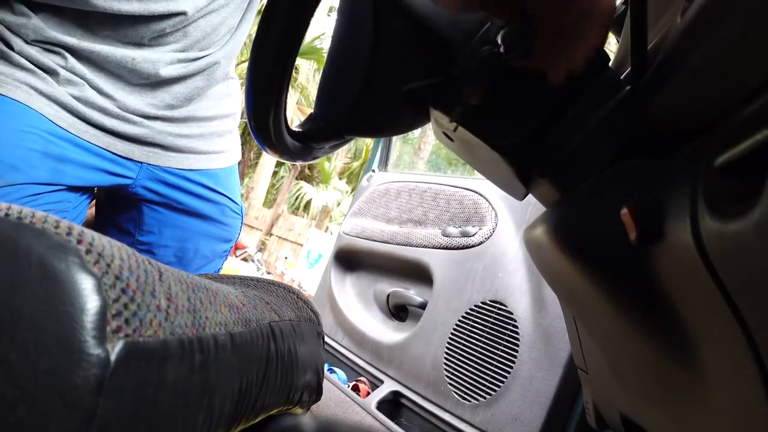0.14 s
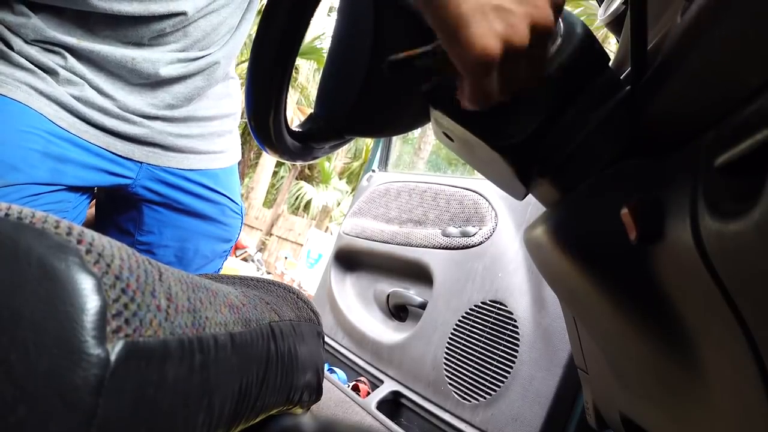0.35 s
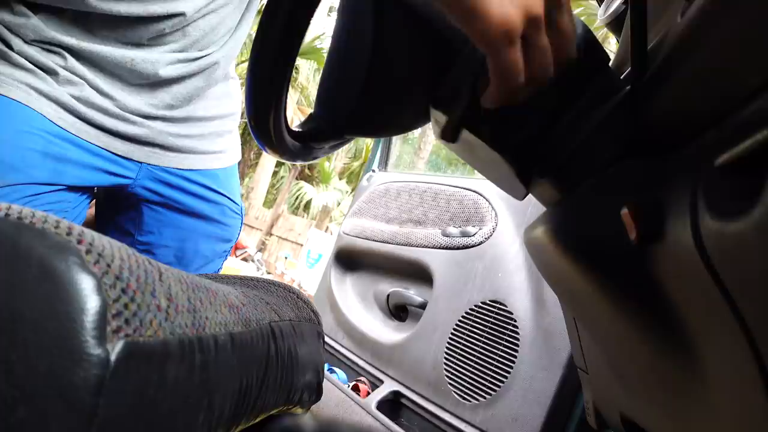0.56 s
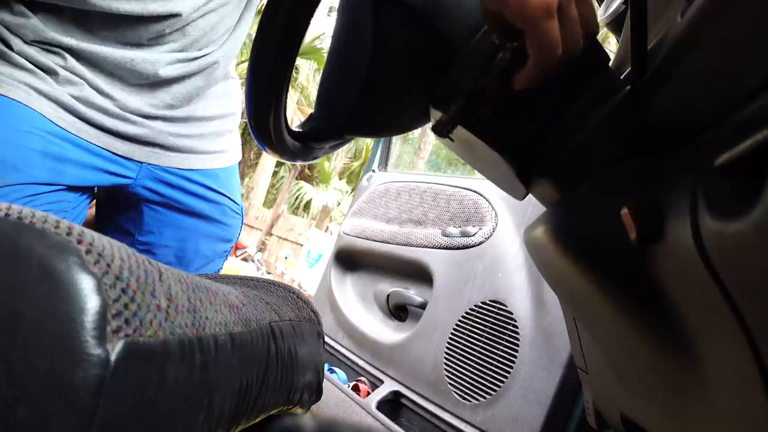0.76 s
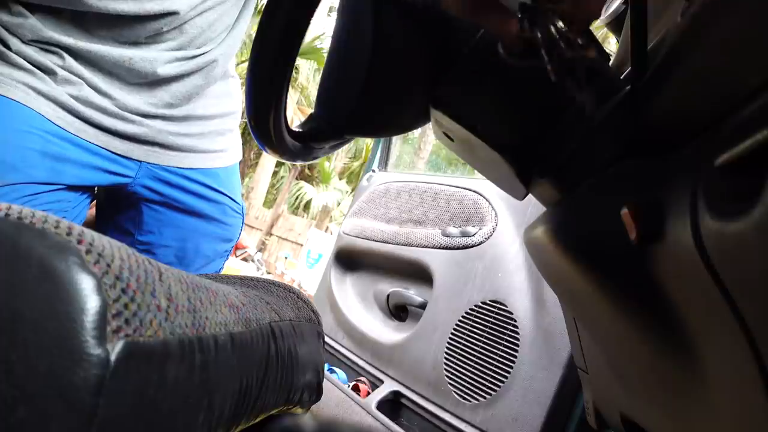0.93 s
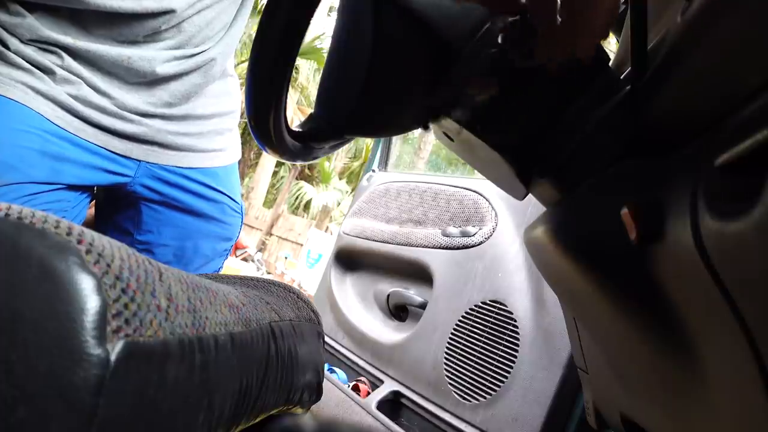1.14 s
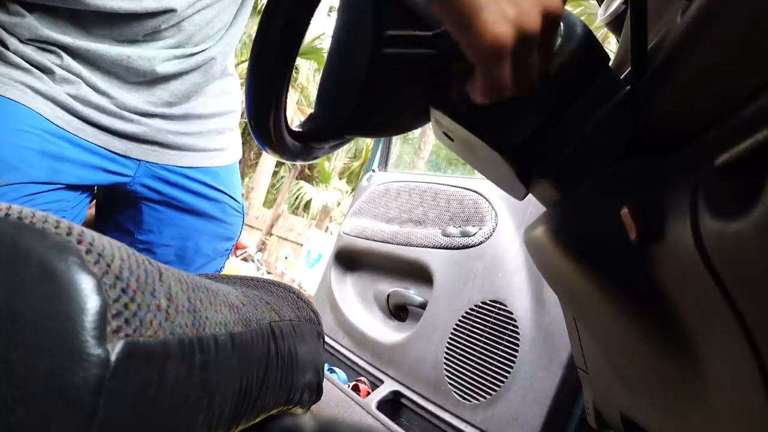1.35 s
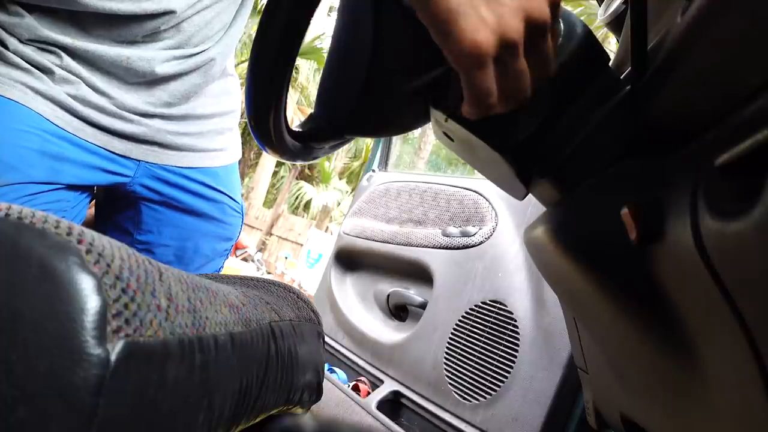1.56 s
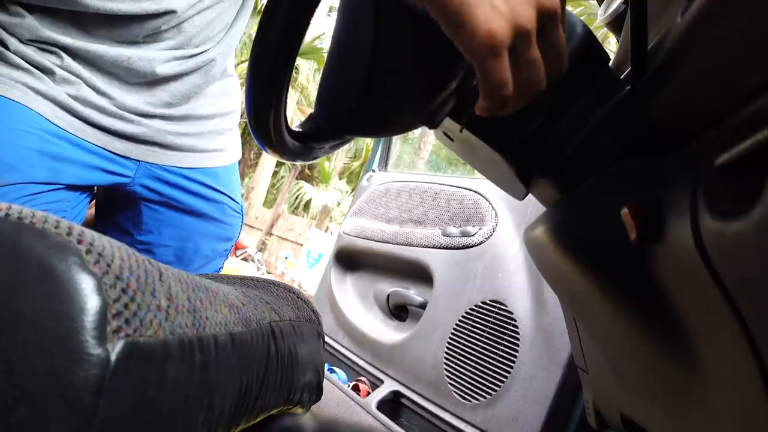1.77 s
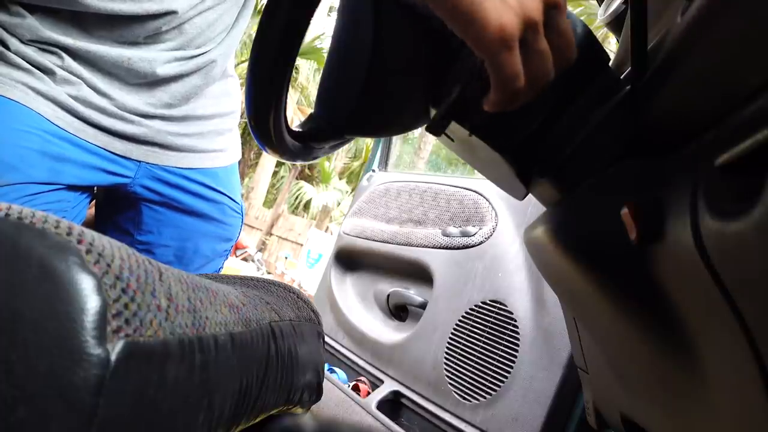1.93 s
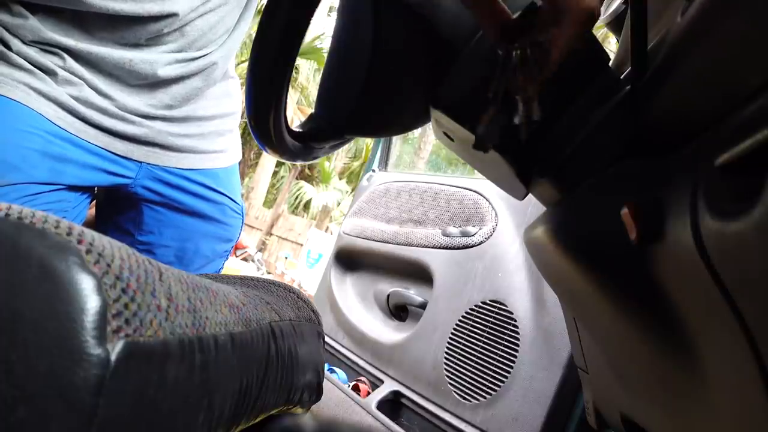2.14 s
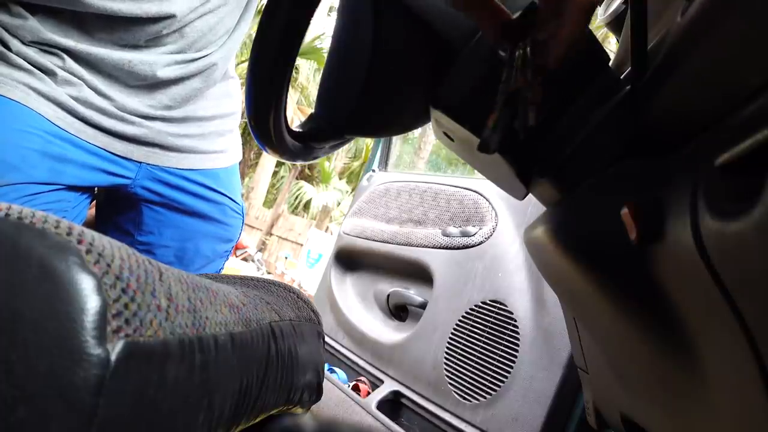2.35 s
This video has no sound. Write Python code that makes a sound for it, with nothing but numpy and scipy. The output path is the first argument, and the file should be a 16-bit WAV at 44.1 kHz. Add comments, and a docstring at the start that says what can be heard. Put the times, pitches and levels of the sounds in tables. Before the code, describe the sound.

A key clacks in a car's ignition lock, close by, with the hanging keys ticking and jingling. Light clinks lead to a loud cluster of clacks at about 0.3 seconds, another near 0.85, and a longer rattle from 1.15 to 1.4. After a lull, small clicks lead to a last clack at 2.1. Soft handling rumble, a faint outdoor hush and distant insects lie underneath.

```python
"""Key in an ignition lock.

A key is worked back and forth in a parked car with its door open. The lock's detents clack and ring
the barrel and the column housing; the hanging keys tick, chime and slide on each other. The small cabin
gives each hit a short tail; behind it are handling rumble and a faint outdoor hush with insects."""
import sys
import numpy as np
from scipy import signal
from scipy.fft import rfft, irfft
from scipy.io import wavfile

SR = 44100
rng = np.random.default_rng(int(sys.argv[2]) if len(sys.argv) > 2 else 0)


def to_wav(sig):
    """Store sig (one row per channel, or 1-D mono) as 16-bit WAV at the path in sys.argv[1].

    Samples outside -1..1 are clipped; the rate is SR.
    """
    pcm = np.clip(np.atleast_2d(sig), -1, 1) * 32767
    pcm = np.round(pcm).astype(np.int16)
    wavfile.write(sys.argv[1], SR, pcm.T)  # frames by channels


N = 105840
TIME = np.arange(N) / SR
AGE = np.arange(int(0.45 * SR)) / SR  # s since a hit
TOP_HZ = 16000


def undb(db):
    """Decibels to gain."""
    return 10 ** (np.asarray(db) / 20)


def unit(x):
    """Scale to rms 1."""
    return x / np.sqrt(np.mean(x ** 2) + 1e-20)


def strike(x, db):
    """Scale a hit to an rms level over its first 6 ms."""
    return x * undb(db) / np.sqrt(np.mean(x[AGE < 0.006] ** 2))


def band(x, lo_hz, hi_hz, order=2):
    """Butterworth band-pass."""
    hi_hz = min(hi_hz, 0.47 * SR)
    lo_hz = min(lo_hz, (lo_hz + hi_hz) / 2, hi_hz - 1)
    return signal.sosfilt(signal.butter(order, [lo_hz, hi_hz], "band", fs=SR, output="sos"), x)


def coloured(spectrum):
    """Unit-rms noise shaped by (f/Hz, level/dB) points."""
    hz, db = np.array(spectrum).T
    bins_hz = np.arange(N // 2 + 1) * SR / N
    gain = undb(np.interp(np.log(bins_hz + 1), np.log(hz), db))
    return unit(irfft(rfft(rng.standard_normal(N)) * gain, N))


def gain_curve(points):
    """Gain over the scene from (t/s, level/dB) points."""
    return undb(np.interp(TIME, *np.array(points).T))


def decay(age_s, t60_s):
    """Exponential fall, 60 dB in t60_s."""
    return np.exp(-np.log(1000) * age_s / t60_s)


def fade(rise_s, t60_s, hold_s=0):
    """Quick rise, optional hold, exponential decay."""
    return (1 - np.exp(-AGE / rise_s)) * decay(np.maximum(AGE - hold_s, 0), t60_s)


def ring(modes, rise_s, hold_s=0):
    """Sum of decaying modes (f/Hz, level/dB, t60/s)."""
    return sum(undb(db) * np.sin(2 * np.pi * hz * AGE) * fade(rise_s, t60_s, hold_s)
               for hz, db, t60_s in modes)


def add(out, start_s, x):
    """Mix x in at start_s."""
    i = max(int(start_s * SR), 0)
    out[i:i + len(x)] += x[:max(N - i, 0)]


# hush spectrum: f/Hz, rel. level/dB
HUSH_SPECTRUM = [(20, 8), (100, -4.5), (300, -19.5), (900, -23.5), (1400, -30.5), (1700, -26.5),
                 (3500, -34.5), (7000, -39), (16000, -43.5)]
# insect noise bands: f/Hz, width/Hz, base level/dB
INSECT_BANDS = [(4570, 40, -83), (5100, 700, -79.5), (5230, 79, -80), (8800, 1100, -77),
                (10050, 560, -80.5)]
# swell of the bands: t/s, gain/dB
INSECT_SWELL = [(0, -12), (0.9, -6.5), (1.5, 4), (1.72, 0), (1.95, 1), (2.4, -0.5)]
# insect tones: f/Hz, base level/dB
WHINE_TONES = [(5305, -72), (9980, -75.5)]
# swell of the tones: t/s, gain/dB
WHINE_SWELL = [(0, -22.5), (1.5, -8), (2.2, 2), (2.3, -2.5), (2.4, 8.5)]

def outdoors():
    """A steady hush and thin, distant insects through the open door."""
    insects = sum(undb(db) * unit(band(rng.standard_normal(N), hz - width_hz / 2, hz + width_hz / 2))
                  for hz, width_hz, db in INSECT_BANDS)
    waver_hz = 25 * unit(band(rng.standard_normal(N), lo_hz=3, hi_hz=59.4))
    whine = sum(undb(db) * np.sin(2 * np.pi * np.cumsum(hz + waver_hz) / SR) for hz, db in WHINE_TONES)
    hush = undb(-56.5) * coloured(HUSH_SPECTRUM)
    return hush + insects * gain_curve(INSECT_SWELL) + whine * gain_curve(WHINE_SWELL)


# rumble spectrum: f/Hz, rel. level/dB
RUMBLE_SPECTRUM = [(20, -1), (50, -7), (100, 3.5), (170, -2.5), (300, -9), (520, -6.5), (1100, -23),
                   (2500, -35), (8000, -60.5)]
# rumble envelope: t/s, rel. level/dB
RUMBLE_SWELL = [(0.0, -41.5), (0.19, -46.5), (0.29, -31.5), (0.39, -53.5), (0.42, -45), (0.63, -66),
                (0.89, -37.5), (1.06, -54), (1.08, -39), (1.14, -54), (1.34, -35.5), (1.46, -61.5),
                (1.81, -88), (2.05, -41.5), (2.09, -61), (2.13, -38.5), (2.23, -61), (2.4, -65)]

def handling():
    """Low rustle and rumble as the hand works at the column."""
    return undb(-3) * coloured(RUMBLE_SPECTRUM) * gain_curve(RUMBLE_SWELL)


def cabin(x):
    """Add dense, short reflections from glass and trim, weaker and quicker in the treble."""
    def reflections(lo_hz, hi_hz, t60_s, db):
        echoes = rng.standard_normal(len(AGE)) * fade(rise_s=0.0011, t60_s=t60_s)
        return undb(db) * band(echoes / np.linalg.norm(echoes), lo_hz, hi_hz)

    body = reflections(lo_hz=80, hi_hz=1900, t60_s=0.077, db=-7.5)
    treble = reflections(lo_hz=3000, hi_hz=TOP_HZ, t60_s=0.041, db=-27.5)
    late = reflections(lo_hz=302, hi_hz=6200, t60_s=0.16, db=-22)
    return x + signal.fftconvolve(x, body + treble + late)[:N]


def pressure(age_s, length_s):
    """Contact force of a slide: a rounded arch, zero at both ends."""
    return np.sqrt(np.sin(np.pi * np.clip(age_s / length_s, 0, 1)))


# keys sliding: start/s, end/s, level/dB, centre f/Hz
KEY_SLIDES = [(.01, 0.177, -63.5, 6150), (0.154, 0.196, -56.5, 5100), (0.191, 0.239, -40, 2724),
              (0.237, 0.329, -37, 4460), (0.418, 0.58, -64.5, 3910), (0.823, 0.858, -34.5, 4400),
              (0.862, 0.899, -28, 4270), (0.887, 0.914, -37.5, 3000), (0.99, 1.018, -51, 3000),
              (1.028, 1.118, -62, 5500), (1.175, 1.278, -42.5, 4540), (1.253, 1.347, -34.5, 3900),
              (1.351, 1.397, -43.5, 3560), (1.38, 1.437, -54.5, 4800), (1.937, 1.978, -53, 3350),
              (2.002, 2.051, -53.5, 3000), (2.129, 2.177, -39, 3000)]

def key_slides(pings_per_s=2400, max_pings=700, t60_s=0.0078, spread_oct=0.85, rolloff_hz=10500):
    """Toothed edges slide over each other: a shower of tiny pings over a fine metal scrape."""
    out = np.zeros(N)
    age_s = AGE[AGE < 2 * t60_s]
    scrape = undb(-8) * unit(band(rng.standard_normal(N), lo_hz=1500, hi_hz=9000, order=1))
    for start_s, end_s, db, centre_hz in KEY_SLIDES:
        length_s = end_s - start_s
        onsets_s = np.cumsum(rng.exponential(size=max_pings)) / pings_per_s
        sizes_db = 2.3 * np.minimum(rng.exponential(size=max_pings), 4)
        pitches_hz = centre_hz * 2 ** (spread_oct * rng.standard_normal(max_pings))
        grit = np.zeros(N)
        for t, size_db, hz in zip(onsets_s[onsets_s < length_s], sizes_db, pitches_hz):
            rolloff = (hz < TOP_HZ) / np.sqrt(1 + (hz / rolloff_hz) ** 6)
            ping = np.sin(2 * np.pi * hz * age_s) * decay(age_s, t60_s)
            add(grit, start_s + t, pressure(t, length_s) * rolloff * undb(size_db) * ping)
        grit = unit(grit) * np.sqrt(length_s * SR / N)  # rms 1 over the slide
        out += undb(db) * (grit + scrape * pressure(TIME - start_s, length_s))
    return out


# modes of three keys: key index, f/Hz, rel. level/dB, t60/s
FREE_KEY_MODES = [(0, 7430, -8.5, 0.2), (0, 8055, -3, 0.11), (0, 11500, -24.5, 0.1), (0, 13840, -8.5, 0.08),
                  (0, 2910, -17.5, .05), (1, 4680, 1, 0.054), (1, 7850, -11.5, 0.092),
                  (1, 9840, -20, 0.049), (1, 10980, -7.5, 0.085), (1, 13640, -15, 0.13), (2, 8500, 7, 0.09),
                  (2, 12580, -12.5, 0.069), (2, 3796, -11, .15), (2, 5430, -9, 0.14)]
# a key swings free: t/s, key index, gain/dB
KEY_CHIMES = [(0.0662, 0, -46.5), (.134, 1, -28.5), (0.206, 2, -47.5), (0.8698, 2, -36), (0.972, 2, -50),
              (1.1526, 0, -18), (1.3492, 0, -29.5)]

def key_chimes():
    """A free-hanging key rings in its own modes."""
    out = np.zeros(N)
    for t, key, db in KEY_CHIMES:
        modes = [mode for owner, *mode in FREE_KEY_MODES if owner == key]
        add(out, t, undb(db) * ring(modes, rise_s=0.00022))
    return out


# clink modes: ratio to pitch, rel. level/dB, t60/s
EDGE_MODES = [(1, -1.5, 0.023), (1.045, -5, .025), (1.72, -10, 0.023)]
# edge hits on the key ring: t/s, f/Hz, level/dB
KEY_CLINKS = [(.093, 4750, -45.5), (0.871, 8500, -22.5), (.915, 3640, -54), (.9225, 5500, -49),
              (1.211, 4750, -34), (1.211, 2820, -31), (1.245, 4400, -36), (1.2488, 4750, -33),
              (1.302, 3700, -33.5), (1.3535, 14200, -38), (1.3578, 5600, -33), (2.2265, 4830, -49)]

def key_clinks():
    """A key's edge meets the ring: a close pair of modes and an overtone, quickly damped."""
    out = np.zeros(N)
    for t, hz, db in KEY_CLINKS:
        modes = [(hz * ratio, mode_db, t60_s) for ratio, mode_db, t60_s in EDGE_MODES
                 if hz * ratio < TOP_HZ]
        add(out, t, strike(ring(modes, rise_s=0.00063), db))
    return out


# key bunch modes: f/Hz, rel. level/dB, t60/s before hand damping
BUNCH_MODES = [(3045, 18, 0.02), (3280, 8.5, 0.056), (4680, 1.5, 0.016), (5266, 0, 0.028),
               (6004, -11, 0.047), (6250, -15, 0.043), (8100, 0, 0.24), (8480, 9.5, 0.092),
               (9740, 10, 0.065), (12580, -6, .08), (14200, -0.5, .07), (14650, -13.5, .07)]

def bunch(noise, centre_hz, scatter_db=11, falloff_db_per_oct=8, hand_t60_s=0.12):
    """The bunch rings, damped by the hand; each touch favours random modes, mostly near centre_hz."""
    offsets_db = scatter_db * np.clip(noise, -1, 1)
    modes = [(hz, db + offset_db - falloff_db_per_oct * abs(np.log2(hz / centre_hz)), t60_s)
             for (hz, db, t60_s), offset_db in zip(BUNCH_MODES, offsets_db)]
    return ring(modes, rise_s=0.00025) * decay(AGE, hand_t60_s)


# key-on-key taps: t/s, tick level/dB, centre f/Hz, t60/s, knock level/dB
KEY_TICKS = [(.006, -35, 7800, 0.026, -37), (0.0415, -57, 7500, 0.014, -47),
             (0.0653, -39, 7200, 0.011, -59), (.084, -53, 4600, 0.018, -46),
             (0.133, -36.5, 6500, 0.042, -40), (0.3117, -22, 6940, 0.0078, -44.5),
             (.49, -42.5, 4850, 0.018, -64), (0.513, -52, 5270, 0.018, -75),
             (0.5456, -45, 6820, 0.0078, -60), (0.5514, -44, 6520, 0.031, -58.5),
             (0.636, -64.5, 4800, 0.015, -62.5), (0.815, -46.5, 5100, 0.11, -43),
             (0.917, -40.5, 7800, 0.012, -48), (0.95, -44, 6200, 0.036, -79.5),
             (0.9724, -52.5, 8500, .015, -46.5), (1.068, -36.5, 6570, 0.026, -42.5),
             (1.1528, -27.5, 8800, 0.011, -50), (1.2097, -29, 5540, 0.016, -33.5),
             (1.2493, -30.5, 6170, 0.044, -36), (1.304, -30.5, 5230, 0.0099, -30.5),
             (1.4142, -39.5, 6200, 0.013, -42), (2.107, -50.5, 4830, 0.095, -42),
             (2.2196, -51, 4860, 0.025, -65.5), (2.2252, -41, 5240, 0.011, -58.5),
             (2.26, -45.5, 6760, 0.023, -58.5)]

def key_ticks(edge_ratio=1.704):
    """Keys tap: a bright burst of tiny collisions, a short ping, a dull knock through ring and fob."""
    out = np.zeros(N)
    for t, db, hz, t60_s, knock_db in KEY_TICKS:
        tick_noise, knock_noise, ping_noise = rng.standard_normal((3, len(AGE)))
        tick = band(tick_noise * fade(rise_s=0.00015, t60_s=t60_s), hz / edge_ratio, hz * edge_ratio)
        knock = band(knock_noise * fade(rise_s=0.0018, t60_s=0.059), lo_hz=405, hi_hz=2420)
        ping = bunch(ping_noise, hz)
        add(out, t, strike(tick, db) + strike(ping, db - 9.5) + strike(knock, knock_db))
    return out


# plastic housing modes: ratio to pitch, rel. level/dB, t60/s
HOUSING_MODES = [(0.521, -19.5, 0.073), (.64, -18.5, 0.039), (.86, -10, 0.045), (1, 4.5, .042),
                 (1.32, -4.5, 0.034)]

def housing(hz, db, rise_s=0.00071, hard_blow_db=-18.5, edge_ratio=1.83):
    """The column cover knocks, its trim buzzes and the dashboard sounds hollow."""
    detunes = 1 + 0.026 * rng.standard_normal(len(HOUSING_MODES))
    modes = [(hz * ratio * detune, mode_db, t60_s)
             for (ratio, mode_db, t60_s), detune in zip(HOUSING_MODES, detunes)]
    knock_db = 0.55 * min(db - hard_blow_db, 0)  # on soft blows the pitch sinks into the buzz
    knock = strike(ring(modes, rise_s), knock_db)
    buzz_noise, dash_noise = rng.standard_normal((2, len(AGE)))
    buzz = band(buzz_noise * fade(rise_s, t60_s=0.05), hz / edge_ratio, hz * edge_ratio)
    dash = unit(band(dash_noise, lo_hz=540, hi_hz=594, order=3)) * fade(rise_s, t60_s=0.08)
    return strike(knock + strike(buzz, db=-9.5), db) + dash * undb(0.4 * db - 25)


# barrel and bracket modes: f/Hz, rel. level/dB, t60/s
BARREL_MODES = [(1460, -16.5, .065), (1709.5, -3, 0.006), (1811, 1.5, 0.0031), (2045, -16.5, 0.014),
                (2804, -17.5, 0.031), (3326, -21, .07), (3780, -36, 0.034), (4350, -27, .05)]

def barrel(db):
    """The lock barrel and its bracket ring, slightly detuned at each hit."""
    detunes = 1 + 0.011 * rng.standard_normal(len(BARREL_MODES))
    modes = [(hz * detune, mode_db, t60_s)
             for (hz, mode_db, t60_s), detune in zip(BARREL_MODES, detunes)]
    return strike(ring(modes, rise_s=0.0011, hold_s=0.004), db)


# detent hits: t/s, barrel level/dB, housing level/dB, housing f/Hz, crack level/dB, crack top f/Hz
DETENTS = [(0.1108, -33, -42, 1050, -39, 4530), (0.1646, -36, -40, 954, -38, 6560),
           (0.1988, -44.5, -44.5, 970, -40.5, 4000), (0.2386, -14.5, -29, 984, -16.5, 7250),
           (0.2742, -10.5, -21, 1085, -17, 7250), (.286, -35.5, -19, 810, -14.5, 6750),
           (0.2914, -57, -19.5, 831, -19, 9260), (0.2984, -50, -24.5, 880, -19.5, 10000),
           (.4215, -46, -40, 655, -40, 6600), (0.687, -47, -45.5, 1065, -49, 3000),
           (0.7294, -48.5, -38, 1133, -41.5, 3500), (.768, -49.5, -40.5, 560, -50, 6840),
           (0.8317, -13, -26.5, 1026, -19.5, 5800), (0.8708, -26, -29, 1176, -23, 8100),
           (0.8796, -23, -20, 1103, -22.5, 12200), (0.9599, -39, -34, 645, -40.5, 3980),
           (0.9986, -47, -45.5, 910, -55, 4050), (1.183, -38, -39, 1070, -31.5, 3100),
           (1.1903, -36, -45.5, 990, -42, 3180), (1.2842, -15, -23.5, 1075, -19, 6200),
           (1.3219, -11.5, -26.5, 1047, -17.5, 7500), (1.3458, -19.5, -21, 834, -16, 5100),
           (1.359, -51, -25.5, 890, -30, 7540), (1.472, -52.5, -51, 990, -59.5, 3000),
           (1.526, -47.5, -46, 1027, -52, 3000), (1.561, -58.5, -52.5, 526.6, -55.5, 6080),
           (1.9662, -42.5, -43.5, 678, -44, 5560), (2.0156, -34, -46.5, 980, -44, 4520),
           (2.03, -43.5, -44, 670, -40, 3870), (2.1213, -11.5, -26.5, 999, -21, 6740),
           (2.133, -50, -27.5, 920, -27.5, 5580), (2.393, -63, -51.5, 946, -68, 4460)]

def lock(lead_s=0.0034, rise_s=0.00061):
    """A detent scrapes, then snaps: crack, barrel ring, housing knock, column thud, shaken keys."""
    out = np.zeros(N)
    snap = fade(rise_s, t60_s=0.0046)
    chatter = undb(-8) * fade(rise_s, t60_s=0.039)  # loose parts
    scrape_swell = np.exp(-abs(AGE - lead_s) / 0.0013)  # peaks at the snap
    for t, barrel_db, housing_db, housing_hz, crack_db, top_hz in DETENTS:
        crack_noise, thud_noise, scrape_noise, ping_noise = rng.standard_normal((4, len(AGE)))
        scrape = band(scrape_noise * scrape_swell, lo_hz=827, hi_hz=top_hz, order=1)
        add(out, t - lead_s, strike(scrape, crack_db - 11.5))
        crack = strike(band(crack_noise * (snap + chatter), lo_hz=1860, hi_hz=top_hz), crack_db)
        thud = unit(band(thud_noise, lo_hz=115, hi_hz=560)) * fade(rise_s=0.00071, t60_s=0.07)
        thud *= undb(0.65 * housing_db - 19.5)  # grows more slowly than the knock
        ping = strike(bunch(ping_noise, centre_hz=1.8 * top_hz), crack_db - 14)
        add(out, t, barrel(barrel_db) + housing(housing_hz, housing_db) + crack + thud + ping)
    return out


def scene():
    """Lock and keys in the cabin, over rumble and outdoor hush; mono."""
    lock_and_keys = lock() + key_ticks() + key_clinks() + key_chimes() + key_slides()
    return (cabin(lock_and_keys) + handling() + outdoors())[None]


def record(dry):
    """Soft-clip the peaks, then low-pass at TOP_HZ."""
    ceiling = 0.85
    lowpass = signal.ellip(10, 0.2, 80, TOP_HZ, fs=SR, output="sos")
    return signal.sosfilt(lowpass, ceiling * np.tanh(dry / ceiling))


dry = scene()
out = record(dry)
to_wav(out)
```